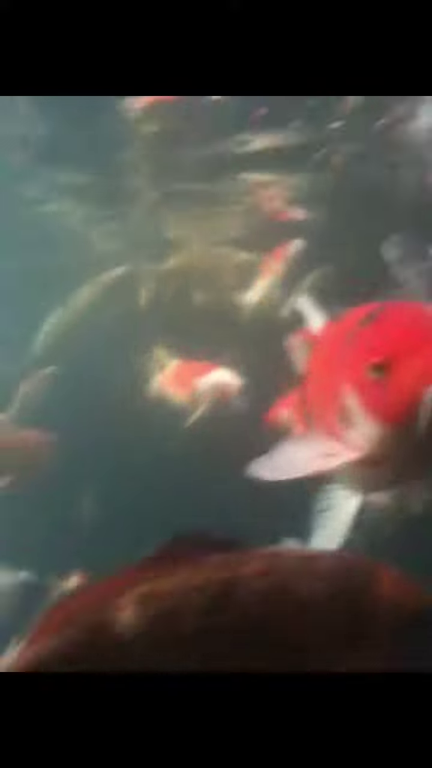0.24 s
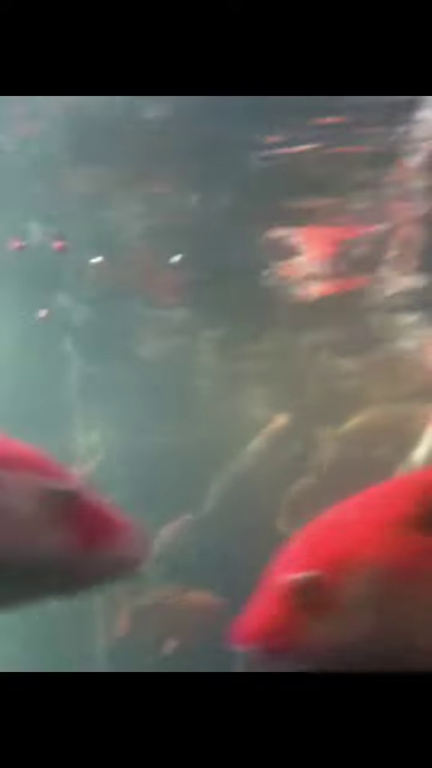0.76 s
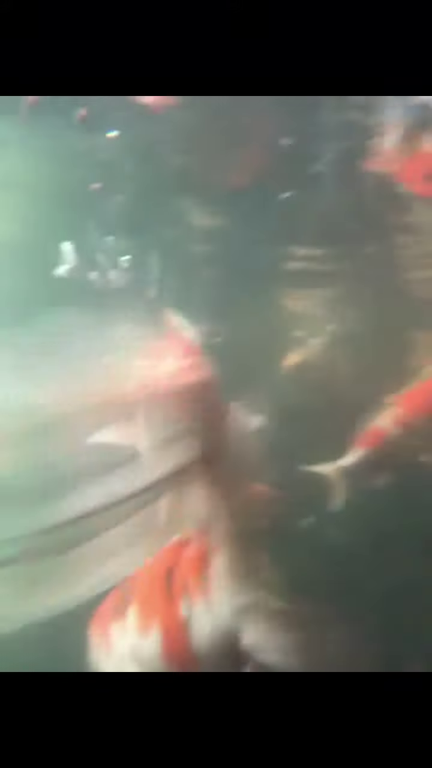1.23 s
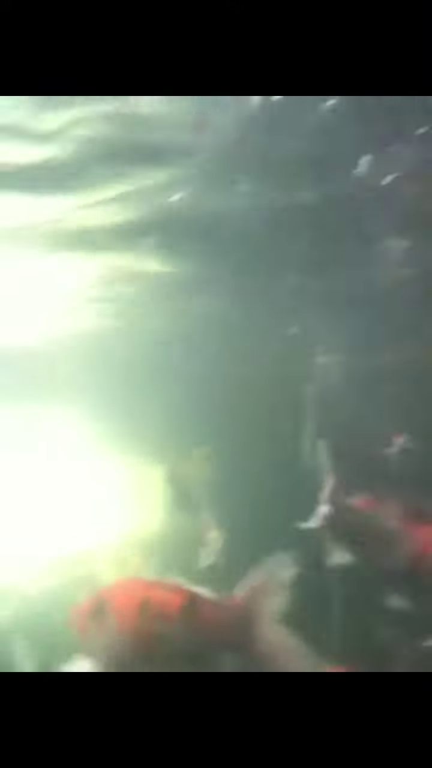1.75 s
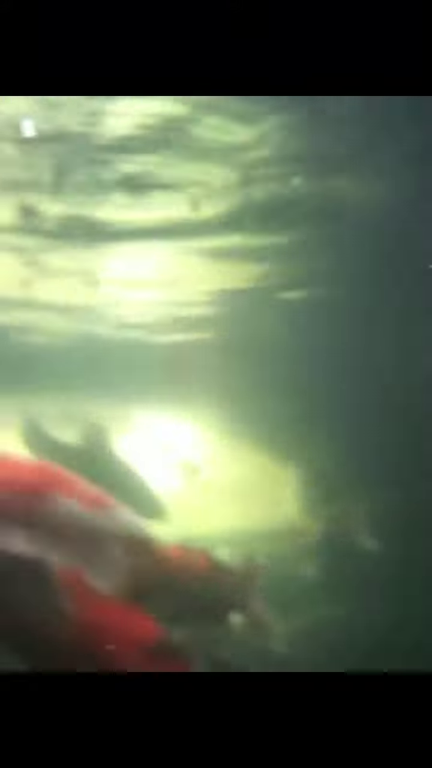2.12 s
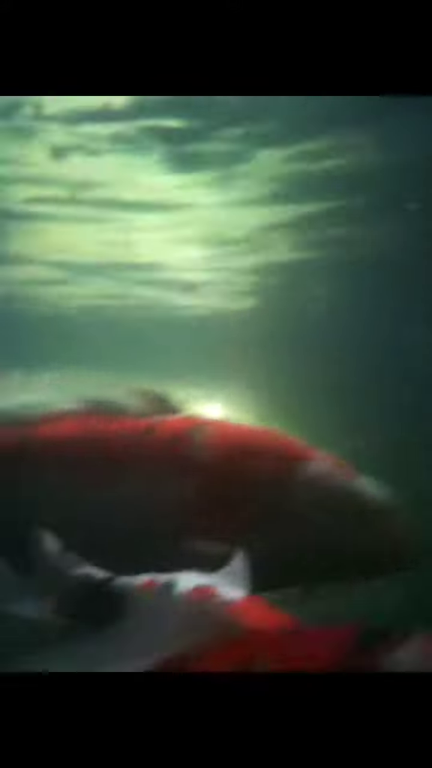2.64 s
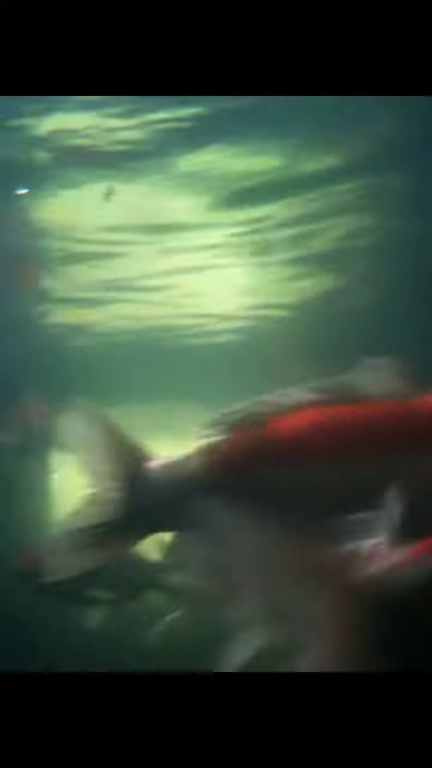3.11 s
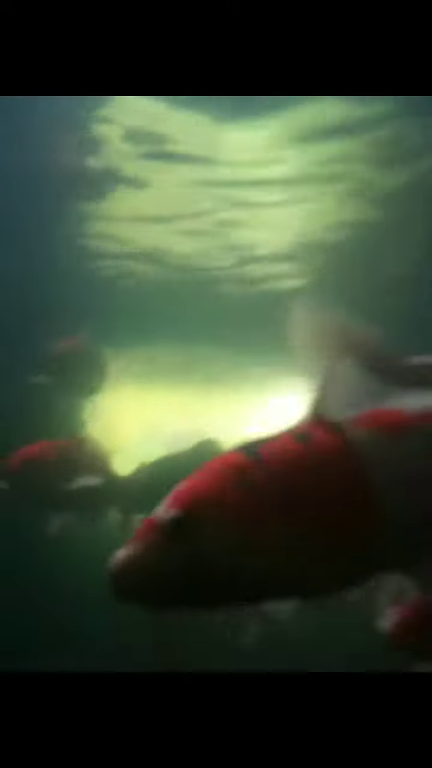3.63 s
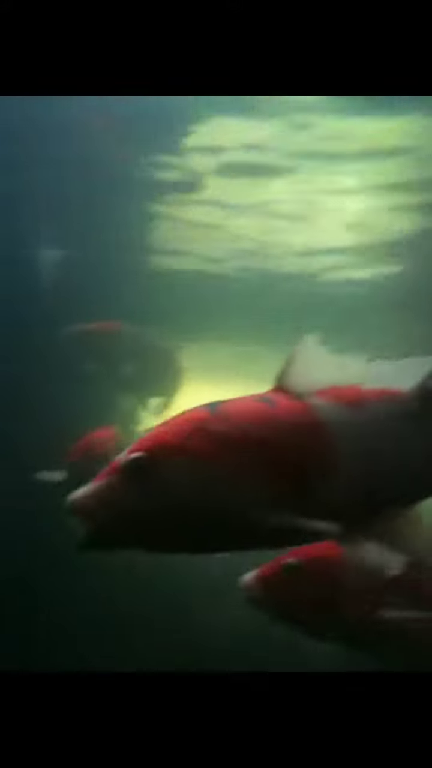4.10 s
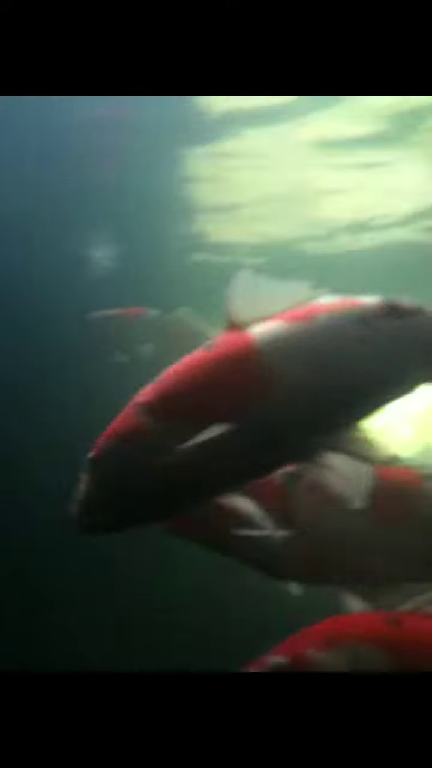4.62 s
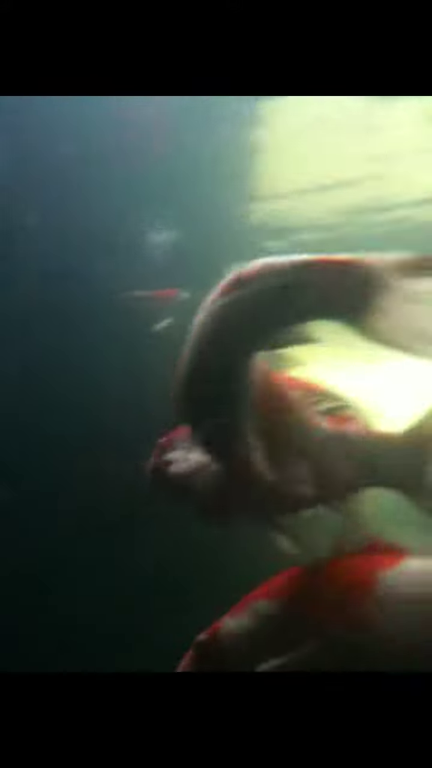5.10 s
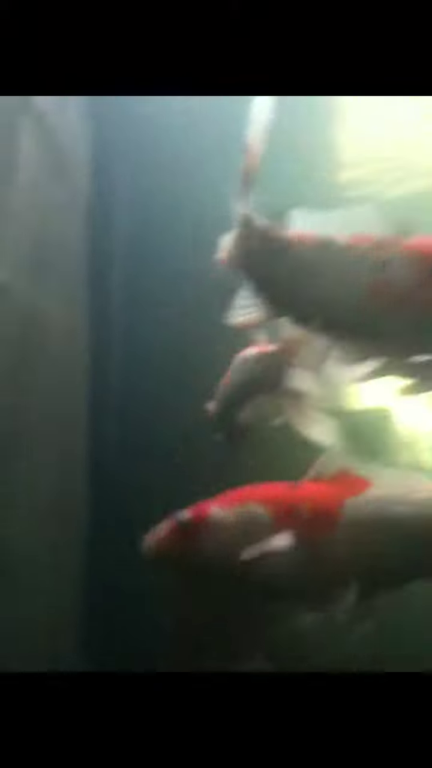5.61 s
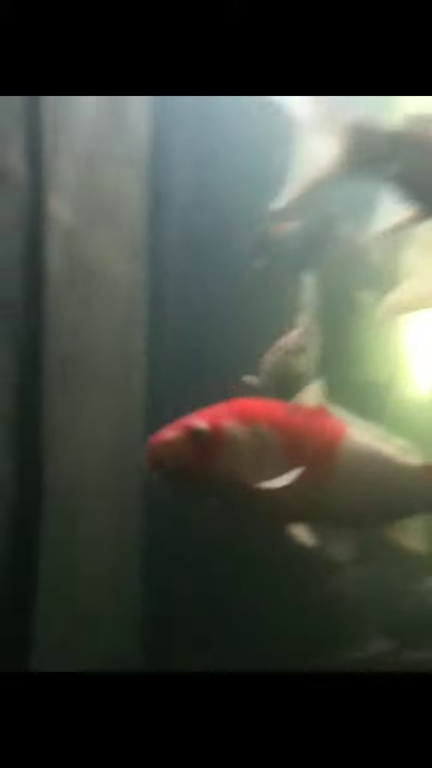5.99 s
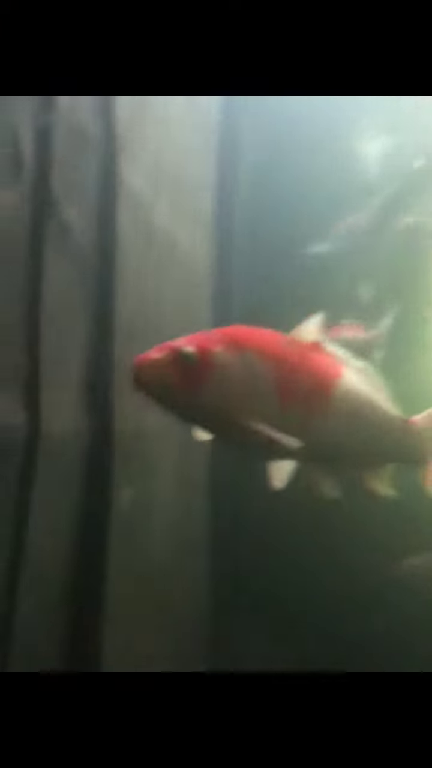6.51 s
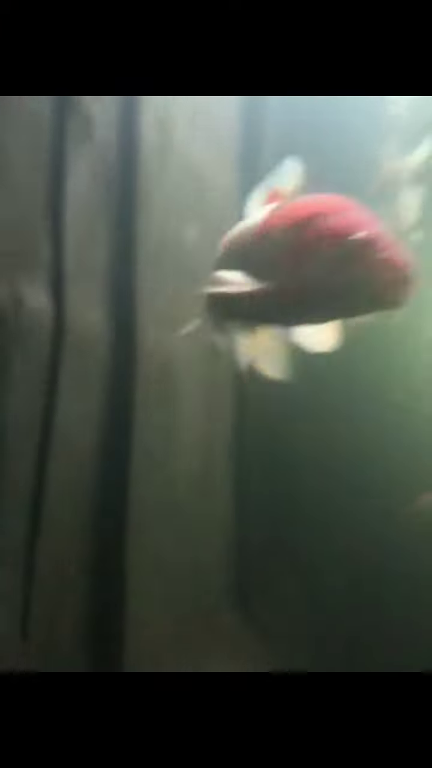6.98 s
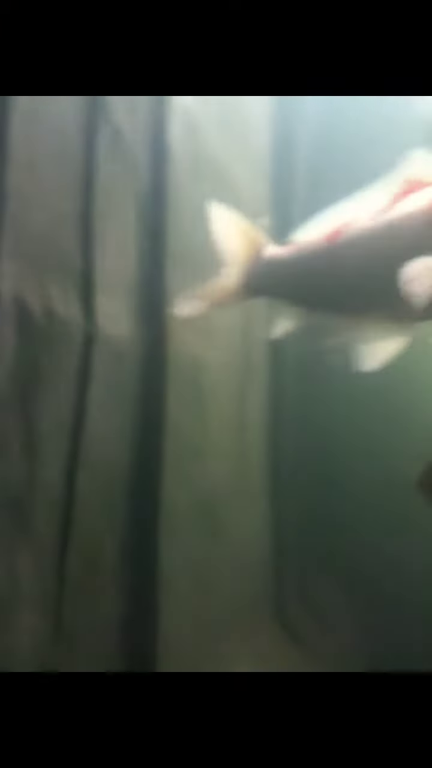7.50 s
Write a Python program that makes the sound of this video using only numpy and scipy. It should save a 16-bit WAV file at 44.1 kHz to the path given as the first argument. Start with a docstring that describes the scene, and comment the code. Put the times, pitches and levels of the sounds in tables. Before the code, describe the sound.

Microphone dips beneath pouring pond water: crisp splashes vanish, heavy muffled thuds and slaps pound close by, then recede into quiet burbling and clicks.

```python
"""Pond inflow heard from a sinking housing

Water pours from a pipe into a garden pond, heard by a camera in a waterproof housing that dips under.
The splashing in the air (droplet noise, ringing bubbles) is shut out; each slug of the stream thuds and
rings the housing's boom modes, the nearest ones with a slap (a crack and its inverted rebound).
The camera drifts away: the thuds sink to a dull rumble under gurgling bubbles (filtered random pulses,
decaying sines) and small ticks on the case (noise bursts through its modes).
"""
import sys
import numpy as np
from scipy import signal
from scipy.fft import irfft
from scipy.io import wavfile
from scipy.ndimage import uniform_filter1d, minimum_filter1d

SR = 44100
rng = np.random.default_rng(int(sys.argv[2]) if len(sys.argv) > 2 else 0)


def unload_audio(sound):
    """Save the sound as a 16-bit wav file, at the path given as the first command line argument."""
    columns = np.transpose(np.atleast_2d(sound))
    # keep every value between -1 and 1, then stretch to whole-number steps
    steps = np.round(np.clip(columns, -1, 1) * 32767)
    wavfile.write(sys.argv[1], SR, steps.astype(np.int16))


N = 341775
TIME = np.arange(N) / SR
HZ = np.fft.rfftfreq(8192, 1 / SR)
SLAP_REACH_DB = -5.5  # slaps no longer carry once the stream's nearness falls below this


def gain_of(db):
    """Decibels to amplitude."""
    return 10 ** (np.asarray(db) / 20)


def evened(x):
    """Scales to rms 1."""
    return x / np.sqrt(np.mean(x ** 2) + 1e-20)


def peaked(x):
    """Scales to peak 1."""
    return x / (abs(x).max() + 1e-20)


def curve(rows, t=TIME, axis=1):
    """One column of a table, joined by straight lines in time."""
    columns = np.transpose(rows)
    return np.interp(t, columns[0], columns[axis])


def colour(points):
    """Spectrum points as gains on the HZ grid; 12 dB/octave fall above the last point."""
    f, db = np.transpose(points)
    gain = gain_of(np.interp(np.log(HZ + 1), np.log(f + 1), db))
    return gain / np.maximum(HZ / f[-1], 1) ** 2


def causal(gain):
    """Minimum-phase impulse response of these gains, scaled to a maximum of 1 and floored at -100 dB."""
    log_gain = np.log(np.maximum(gain / gain.max(), 1e-5))
    circle = np.concatenate([log_gain, log_gain[-2:0:-1]])
    spectrum = np.exp(np.conj(signal.hilbert(circle)))[:len(HZ)]
    return irfft(spectrum)[:len(HZ)]


def through(x, response):
    """Convolution, cut to the length of the scene."""
    return signal.oaconvolve(x, response)[:N]


def add(mix, s, sound):
    """Mixes a sound in at time s."""
    part = mix[max(round(s * SR), 0):][:len(sound)]
    part += sound[:len(part)]


def patter(per_s, spread_db):
    """Random impulses of either sign, a few of them large."""
    size = gain_of(spread_db * np.minimum(rng.exponential(1, N), 4))
    return size * rng.choice([-1, 1], N) * (rng.random(N) < per_s / SR)


def flutter(per_s, depth_db):
    """A gain that wanders at random, per_s knots a second."""
    knots = rng.standard_normal(4096)
    return gain_of(depth_db * np.interp(TIME * per_s, np.arange(len(knots)), knots))


def bubble(hz, cycles, rise):
    """A bubble rings, fading to 1/e in some cycles; a rise above 0 lifts its pitch as it nears the surface."""
    age = np.arange(3000) / SR * hz / cycles  # in 1/e fades
    tone = np.sin(2 * np.pi * cycles * age * (1 + rise * np.minimum(age, 2)))
    return tone * np.exp(-age) * (1 - np.exp(-age * cycles)) ** 2


def bubbling(per_s, lowest_hz, highest_hz, cycles, rise, count=24):
    """Separate notes from bubbles of many sizes, each size with its own ring and glide."""
    pitches_hz = np.geomspace(lowest_hz, highest_hz, num=count)
    factors = rng.uniform(.6, 1.4, (count, 2))
    return evened(sum(through(patter(per_s / count, 3.6), bubble(hz, cycles * ring, rise * glide))
                      for hz, (ring, glide) in zip(pitches_hz, factors)))


def resonate(x, hz, width_hz):
    """A one-pole resonance that follows the curve hz, by shifting to 0 Hz and back."""
    turn, r = np.exp(2j * np.pi * np.cumsum(hz) / SR), np.exp(-np.pi * width_hz / SR)
    return (turn * signal.lfilter([1 - r], [1, -r], x / turn + 1e-18)).real


def case_gain():
    """Stiff modes of the case as gains on the HZ grid, cut below 770 Hz."""
    # Each row: pitch in Hz, width in Hz, relative level in dB.
    case_modes = [(1330, 300, 1), (1710, 60, 4.5), (2140, 240, -2.5), (2670, 150, 0), (3310, 260, -1.5),
                  (3940, 2500, -13), (5270, 98, 3), (6760, 280, -8.5), (8050, 640, -11), (9800, 330, -8.5),
                  (13000, 6600, -19)]
    power = sum(gain_of(db) ** 2 / (1 + (2 * (HZ - hz) / width_hz) ** 2)
                for hz, width_hz, db in case_modes)
    return np.sqrt(power) * HZ ** 4 / (HZ ** 4 + 770.0 ** 4)


def nearness_db(t=TIME):
    """Level of the stream against its level right beside the camera (-18.5 dB)."""
    # Stream level as the camera passes it and drifts off. Each row: time in seconds, level in dB.
    stream_level = [(0.0, -18), (0.41, -16.5), (1.47, -17), (2.85, -17.5), (3.06, -21.5), (3.39, -22),
                    (3.62, -27.5), (5.05, -32), (6.17, -41), (7.75, -44)]
    return curve(stream_level, t) + 18.5


def in_air(t=TIME, dip_s=0.24, dip_length_s=0.13):
    """1 while the housing is at the surface, sliding to 0 as it goes under."""
    return np.clip(1 - (t - dip_s) / dip_length_s, 0, 1)


def slugs(gap_s=0.04, jitter=0.307, thud_level_db=-23, slap_level_db=-42,
          thud_spread_db=3, slap_spread_db=10.5):
    """Heavy slugs plunging in, and lesser ones that break off the stream unevenly in between."""
    # Each row: time in seconds, relative slap level in dB, relative thud level in dB.
    heavy_slugs = [(.007, -27, -17.5), (.085, -19, -13.5), (0.154, -24, -17.5), (.19, -26.5, -17.5),
                   (0.265, -31, -15), (0.313, -11, -10.5), (.348, -17.5, -14), (.405, -26, -18.5),
                   (0.432, -18, -19), (.475, -30, -15.5), (0.511, -42, -13), (.553, -15.5, -24),
                   (.557, -8.5, -9.5), (0.5943, -14.5, -11.5), (.623, -24, -16.5), (0.652, -22, -21),
                   (0.6788, -15, -19.5), (.718, -44, -18.5), (0.761, -4.5, -12.5), (0.8225, -4, -6),
                   (.873, -19.5, -22.5), (.882, -16, -13.5), (0.979, -29.5, -15), (1.026, -23, -20),
                   (1.038, -10, -12.5), (1.0799, -9, -12.5), (1.112, -20, -14), (1.1785, -11.5, -13.5),
                   (1.249, -11.5, -9.5), (1.2863, -12, -16.5), (1.299, -27, -24), (1.32, -26, -22),
                   (1.3373, -0.5, -7.5), (1.405, -9.5, -5), (1.437, -19.5, -11.5), (1.4536, -12, -18),
                   (1.4564, -11.5, -19.5), (1.478, -24.5, -14), (1.5179, -14, -18.5), (1.5621, -9, -13),
                   (1.573, -23.5, -27), (1.6109, -16.5, -24.5), (1.635, -11, -23), (1.6459, -12.5, -23.5),
                   (1.6629, -15.5, -13), (1.679, -21.5, -20.5), (1.7136, -6.5, -13.5), (1.732, -20, -21.5),
                   (1.7539, -18.5, -12.5), (1.809, -6, -10), (1.8706, -12, -16.5), (1.895, -18, -14.5),
                   (1.928, -21, -16), (1.9581, -16.5, -15), (1.986, -20.5, -19.5), (2.0028, -11, -11),
                   (2.0618, -15.5, -27), (2.0672, -7.5, -14.5), (2.089, -21, -30.5), (2.1228, -21, -12),
                   (2.186, -15, -17.5), (2.205, -20, -24), (2.223, -13, -14), (2.2569, -12, -24),
                   (2.26, -9.5, -11), (2.2882, -21.5, -19.5), (2.3286, -22, -18.5), (2.3763, -8, -14.5),
                   (2.404, -15, -22), (2.4218, -25.5, -18), (2.4598, -20, -21), (2.466, -15.5, -11),
                   (2.5057, -7, -11), (2.5226, -22.5, -22), (2.563, -14, -17.5), (2.5759, -6.5, -9.5),
                   (2.593, -21.5, -15.5), (2.6297, -12, -16), (2.665, -46, -19), (2.6994, -14, -21),
                   (2.7083, -12.5, -17), (2.7237, -11.5, -7.5), (2.787, -19.5, -12.5), (2.8062, -10, -15.5),
                   (2.832, -21.5, -13.5), (2.89, -41, -15.5), (2.9159, -10.5, -18.5), (2.962, -19, -13),
                   (2.99, -43, -17), (3.0197, -25.5, -15), (3.0939, -11.5, -13.5), (3.114, -24.5, -19),
                   (3.172, -42, -18), (3.1933, -8, -15.5), (3.253, -43.5, -16), (3.32, -28.5, -14),
                   (3.3789, -17, -15.5), (3.4143, -20, -15), (3.466, -24, -16), (3.5, -46, -18.5),
                   (3.549, -40, -23), (3.603, -38.5, -20), (3.694, -42, -25.5), (3.768, -44, -28.5),
                   (3.792, -44, -26.5), (3.825, -46, -26), (3.863, -37, -17), (3.888, -37, -16.5),
                   (3.931, -44, -27), (4.019, -38, -23.5), (4.071, -40, -23.5), (4.152, -38, -20.5),
                   (4.196, -39, -19.5), (4.253, -46, -25.5), (4.319, -46, -30.5), (4.367, -48, -30),
                   (4.462, -41, -24), (4.479, -44, -29.5), (4.518, -46, -28.5), (4.564, -44, -24),
                   (4.632, -43, -26), (4.772, -47, -29), (4.855, -50, -25), (4.955, -39, -25),
                   (5.179, -41, -31.5), (5.212, -50, -33), (5.242, -45, -32), (5.346, -50, -33),
                   (5.488, -46, -31.5), (5.546, -50, -31.5), (5.681, -44, -31.5), (6.032, -47, -37),
                   (6.333, -48, -34), (6.713, -54, -40.5), (6.829, -58, -41.5), (6.883, -54, -40),
                   (6.958, -54, -40.5), (7.064, -58, -43), (7.331, -54, -39), (7.367, -54, -40.5),
                   (7.506, -54, -41)]
    rows = list(heavy_slugs)
    edges = [0, *sorted(row[0] for row in heavy_slugs), N / SR]
    chances = rng.standard_normal((len(edges), 64, 3))
    for start, end, chance in zip(edges, edges[1:], chances):
        steps = max(round((end - start) / gap_s), 1)
        for k, (early, thud, slap) in zip(range(1, steps), np.clip(chance, -2, 2)):
            s = start + (end - start) * (k + jitter * early) / steps
            near_db = nearness_db(s)
            slap_db = slap_level_db + 2 * near_db + slap_spread_db * slap
            thud_db = thud_level_db + near_db + thud_spread_db * thud
            rows.append((s, slap_db, thud_db))
    return rows


def surge(stream, settle_s, lull):
    """A gain of rms 1 that jumps with each slug and settles to a lull before the next."""
    kicks, t = np.zeros(N), np.arange(SR // 4) / SR
    for s, _, db in stream:
        add(kicks, s, gain_of((db - nearness_db(s)) / 2) * t / settle_s * np.exp(-t / settle_s))
    return evened(evened(kicks) + lull)


def trickle(level_db=-66.5, follows=0.42):
    """A faint crackle of small bubbles rising around the camera, coloured by the case."""
    blips = bubbling(260, 1150, 3400, 3, 0)
    crackle = evened(through(blips * flutter(15, 4), causal(case_gain())))
    return crackle * gain_of(level_db + follows * nearness_db())


def fizz(grain_db=-70.0, hiss_db=-71.5, ring_db=-73.0, ring_hz=5330, follows=0.04):
    """Tiny bubbles burst on the case in flurries and ring near its sharpest high mode, over a patchy hiss."""
    # Hiss spectrum. Each row: frequency in Hz, relative level in dB.
    fizz_colour = [(710, -42), (1200, 0.5), (1700, -3.5), (1890, -11.5), (2710, -2.5), (2950, -5.5),
                   (3910, -2), (5300, -6), (6100, -9), (9610, -4), (10800, -13.5), (15200, -21),
                   (16000, -37)]
    swell = flutter(11, 2.)
    bursts = patter(900, 3.) * flutter(22, 3.)
    grains = evened(through(bursts * swell, causal(case_gain())))
    flurries = swell * flutter(24, 4.)
    ring = evened(sum(through(patter(120, 3.) * flurries, bubble(ring_hz * k, 16, 0))
                      for k in np.linspace(.97, 1.03, num=4)))
    shape, hiss = colour(fizz_colour), np.zeros(N)
    for hz in np.geomspace(1000, 15000, num=16):  # bands flutter independently
        band = shape * np.exp(-(np.log((HZ + 1) / hz) / .13) ** 2)
        noise = rng.standard_normal(N) * np.sqrt(swell) * flutter(28, 2.5)
        hiss += band.max() * through(noise, causal(band))
    out = gain_of(grain_db) * grains + gain_of(ring_db) * ring + gain_of(hiss_db) * evened(hiss)
    return gain_of(follows * nearness_db()) * out


def ticks(focus_db=7.0, focus_width=0.37, note_db=-13.0, rise=0.024, onset_s=0.0005, soft_s=0.018):
    """A bubble scrapes the case: a gritty tick and a short rising note; long scrapes swell in softly."""
    # Each row: start in seconds, scrape peak in dB, pitch in Hz, fade to 1/e in seconds.
    tick_rows = [(3.242, -52, 3370, 0.01), (3.2788, -43.5, 3240, 0.029), (3.8, -51, 3300, 0.0078),
                 (3.911, -42, 3460, 0.019), (3.943, -50, 4000, .016), (4.107, -52, 5300, 0.014),
                 (4.295, -45.5, 1900, 0.0092), (4.359, -49.5, 3220, 0.015), (4.388, -50, 3100, 0.014),
                 (4.44, -44, 5360, .012), (4.442, -55, 2680, 0.01), (4.5525, -45, 3180, 0.0064),
                 (4.6838, -45, 1980, 0.0076), (4.688, -41.5, 3200, 0.019), (4.848, -47.5, 3270, 0.018),
                 (5.151, -46.5, 5200, 0.03), (5.178, -48, 3240, 0.031), (5.5482, -49, 2560, 0.013),
                 (5.602, -41, 5600, 0.018), (5.7644, -42.5, 1750, .01), (5.8148, -49, 1800, .012),
                 (5.827, -44, 1820, 0.017), (6.178, -51.5, 3350, 0.035), (6.256, -45.5, 4000, 0.024),
                 (6.353, -47, 5360, 0.0078), (6.394, -50, 5200, 0.0094), (6.472, -51, 5400, 0.02),
                 (6.742, -42.5, 1692, 0.014), (6.795, -49.5, 3400, 0.011), (6.958, -55, 2920, 0.0061),
                 (7.041, -41, 1620, 0.016), (7.156, -43, 1720, 0.02), (7.304, -46.5, 1650, 0.011),
                 (7.5415, -49.5, 2770, 0.012), (7.716, -48.5, 5100, 0.025)]
    out, t = np.zeros(N), np.arange(SR // 10) / SR
    case = case_gain()
    for (s, db, hz, fade_s), grit in zip(tick_rows, rng.standard_normal((len(tick_rows), len(t)))):
        focus = gain_of(focus_db * np.exp(-(np.log((HZ + 1) / hz) / focus_width) ** 2))
        swell_s = onset_s * (1 + (fade_s / soft_s) ** 4)
        friction = grit * np.exp(-t / fade_s) * (1 - np.exp(-t / swell_s))
        scrape = signal.fftconvolve(friction, causal(case * focus))
        add(out, s, gain_of(db) * peaked(scrape))
        add(out, s, gain_of(db + note_db) * bubble(hz, hz * fade_s / 2, rise))
    return out


def spray(level_db=4.0, shut_s=0.21, drips_db=-2.5, drop_fade_s=0.003):
    """Splashing in open air: a dense crackle of droplets, tiny ringing bubbles and a few larger drops."""
    # Shut out by the dip, briefly back as the housing bobs up.
    # Each row: time in seconds, level in dB before level_db is added.
    spray_level = [(0, -48.5), (.2, -50), (.48, -62.5), (.6, -106), (.9, -70.5), (1.0, -55.5), (1.2, -64)]
    # Spectrum. Each row: frequency in Hz, relative level in dB.
    spray_colour = [(200, -13), (600, 0.5), (1300, 14), (1900, -2.5), (2300, 4), (3000, -3), (3700, -5.5),
                    (4600, -8), (5700, -1.5), (6500, -9), (7500, -17), (10000, -18), (12000, -26),
                    (16000, -33.5)]
    # Larger drops smacking the surface. Each row: start in seconds, peak in dB.
    drops = [(.009, -42), (.034, -43), (.076, -39), (0.125, -38.5), (.16, -42), (.2, -45), (0.225, -37),
             (0.266, -35.5), (.405, -41)]
    shape, t = colour(spray_colour), np.arange(SR // 30) / SR
    droplets = patter(9000, 3.3) * flutter(110, 3.0)
    crackle = evened(through(droplets, causal(shape)))
    drips = np.zeros(N)
    for hz in np.geomspace(1900, 10500, num=36):
        weight = np.interp(hz, HZ, shape) * hz ** .25
        drips += weight * through(patter(42, 4.0), bubble(hz, 12, .004))
    shut = np.clip((spray_level[-1][0] - TIME) / shut_s, 0, 1)
    out = shut * gain_of(curve(spray_level) + level_db) * (crackle + gain_of(drips_db) * evened(drips))
    for (s, db), grit in zip(drops, rng.standard_normal((len(drops), len(t)))):
        smack = signal.fftconvolve(grit * np.exp(-t / drop_fade_s), causal(shape * HZ))
        add(out, s, gain_of(db) * peaked(smack))
    return out


def bubble_run(width_hz=220):
    """Bubbles shrink as they stream past the case, so their ringing climbs."""
    # Each row: time in seconds, level in dB, pitch in Hz.
    run = [(.95, -86, 1004), (1.1, -46, 1130), (1.2, -55.5, 1300), (1.29, -48.5, 1640), (1.38, -52, 1830),
           (1.52, -56, 1810), (1.65, -80, 1830)]
    hz = curve(run, axis=2)
    passing = (TIME > run[0][0]) & (TIME < run[-1][0])
    ringing = resonate(resonate(patter(270, 7.4), hz, width_hz), hz, width_hz)
    return passing * gain_of(curve(run)) * evened(ringing)


def gurgle(level_db=-42.5, follows=1.0, shallow_db=-16.0, sink_s=2.6, notes_db=-8.5,
           froth_db=-3.0, ringing_db=-9.5):
    """Bubble pulses and notes ring near 1 kHz, fuller as the camera sinks; froth and single plops on top."""
    # Spectra of gurgle and froth. Each row: frequency in Hz, relative level in dB.
    gurgle_colour = [(300, -43), (620, -15), (800, -3.5), (920, 3), (1010, 8.5), (1100, -3.5), (1250, -18),
                     (1500, -28.5), (3000, -58)]
    froth_colour = [(300, -17.5), (600, 4.5), (790, 1), (1040, 6), (1250, -3), (1550, -15), (1780, -5.5),
                    (1980, -18), (3000, -25.5), (6000, -66.5)]
    # Froth of smaller bubbles, loudest close to the stream. Each row: time in seconds,
    # level in dB before froth_db or ringing_db is added.
    froth_level = [(0, -44), (.7, -49), (1.3, -40.5), (2.7, -41), (3.2, -72.5), (4.6, -69.5), (7.75, -82)]
    # Bubbles that stand out. Each row: start in seconds, peak in dB, pitch in Hz, cycles to 1/e.
    plops = [(0.009, -30.5, 5750, 6.9), (.034, -40, 6570, 9.7), (.05, -41, 2310, 9.4),
             (.075, -45, 6700, 11), (0.083, -30.5, 2420, 5.4), (.094, -39, 3000, 9), (.124, -33, 5370, 11),
             (.136, -43, 2310, 8), (0.158, -37, 2380, 6), (0.179, -36.5, 2480, 15), (0.209, -35, 2240, 8.2),
             (.218, -36, 2930, 8.9), (0.269, -42, 5830, 11), (.289, -38, 5500, 14),
             (0.373, -36.5, 2170, 9.2), (.505, -55, 3300, 30), (.883, -42.5, 8300, 13),
             (.977, -40, 2300, 7), (.984, -43, 2880, 9), (1.121, -29.5, 1090, 7.2),
             (1.223, -31.5, 1135, 7.4), (1.232, -42, 1550, 9.7), (1.275, -34, 1700, 6),
             (1.304, -35, 1720, 6.6), (1.375, -46, 1800, 7.9), (1.508, -44, 1820, 10),
             (1.84, -32, 1047, 9.8), (1.938, -29, 1066, 13), (2.115, -26.5, 1036, 4.1),
             (2.172, -34.5, 1190, 6.2), (2.311, -29, 1076, 16), (2.496, -42, 1510, 6),
             (2.55, -20.5, 1070, 4), (2.646, -32, 1050, 8), (2.716, -23.5, 1105, 6.1),
             (2.771, -28.5, 1240, 4), (2.774, -37.5, 1770, 6.1), (2.853, -32, 1073, 10),
             (2.879, -34.5, 1083, 18), (3.028, -28, 976, 12), (3.175, -35, 1064, 7), (3.258, -33, 880, 6),
             (3.35, -33, 1020, 8.6), (3.745, -39, 960, 9), (3.971, -39, 1024, 12), (4.13, -47, 1240, 5),
             (4.196, -47, 1110, 8.8), (4.444, -46.5, 2660, 17), (4.559, -32.5, 978, 12),
             (4.605, -56, 1380, 7), (4.686, -40.5, 1680, 11), (4.69, -44, 2040, 12), (4.93, -40, 963, 3.4),
             (5.082, -42, 960, 15), (5.408, -38, 984, 3.1), (5.787, -48, 904, 7.2), (6.009, -34, 1006, 2.3),
             (6.345, -53, 950, 4.5), (6.47, -53, 1000, 5), (6.62, -57, 970, 5.8), (6.84, -51.5, 1020, 5.8),
             (6.991, -54, 1380, 7), (6.996, -42.5, 1700, 14), (7.008, -53, 1490, 7.8),
             (7.043, -40, 1410, 6), (7.158, -63, 1380, 6), (7.255, -53, 810, 4), (7.318, -51, 910, 4)]
    pulses = patter(500, 3.3) * flutter(25, 2.6)
    bubbles = evened(through(pulses, causal(colour(gurgle_colour))))
    bursts = patter(500, 3.0) * flutter(40, 3.0)
    froth = evened(through(bursts, causal(colour(froth_colour))))
    ringing = bubbling(220, 950, 1650, 6, .008)
    notes = bubbling(160, 780, 1170, 5, .012)
    depth_db = shallow_db * np.maximum(1 - TIME / sink_s, 0)
    out = (bubbles + gain_of(notes_db) * notes) * gain_of(level_db + follows * nearness_db() + depth_db)
    out += (gain_of(froth_db) * froth + gain_of(ringing_db) * ringing) * gain_of(curve(froth_level))
    for s, db, hz, cycles in plops:
        add(out, s, gain_of(db) * peaked(bubble(hz, cycles, 0.0012)))
    return out


def churn(stream, churn_db=-25, churn_follows=1.03, lumpy_db=1.0, rumble_db=-26.5, rumble_follows=1.39,
          rumble_air_db=-23.0, murmur_db=-50.0):
    """Blobs surge after each slug and keep the boom going, over the bubble cloud's heave and pond murmur."""
    # Spectra of blobs, heave and murmur. Each row: frequency in Hz, relative level in dB.
    churn_colour = [(30, -56), (90, -24), (150, -3.5), (210, -4), (262, 1.5), (290, -3), (330, -20.5),
                    (375, -13), (440, -14), (520, -43), (620, -49), (1200, -83.5)]
    rumble_colour = [(20, -60), (45, -40), (65, -20), (85, -5), (105, 0), (150, -1), (195, -8), (300, -28),
                     (600, -60)]
    murmur_colour = [(20, -9.5), (45, 4.5), (70, 4), (110, 17.5), (250, -17), (350, 4), (450, -8),
                     (620, -31), (1400, -34.5), (2500, -46)]
    blobs = evened(through(patter(260, 5.27) * flutter(30, lumpy_db), causal(colour(churn_colour))))
    heave = evened(through(patter(300, 1.5), causal(colour(rumble_colour))))
    murmur = evened(through(patter(170, 3.4) * flutter(22, 2.5), causal(colour(murmur_colour))))
    blobs *= gain_of(churn_db + churn_follows * nearness_db())
    heave *= gain_of(rumble_db + rumble_follows * nearness_db() + rumble_air_db * in_air())
    return surge(stream, .014, .3) * (blobs + heave) + gain_of(murmur_db) * murmur


def slaps(stream, level_db=1.0, air_db=-5.0, collapse_s=.001, rebound_s=.0056, rebound_db=-7.5,
          ragged_db=-9.5, ragged_s=0.02, grit_db=-34, grit_s=0.0093, clean_db=-11.5, cleaning=0.21):
    """A near slug's cavity collapses with a crack, then a weaker inverted rebound; soft slaps are ragged."""
    # Spectrum. Each row: frequency in Hz, relative level in dB.
    slap_colour = [(30, -77), (60, -39), (120, -8), (250, 5.5), (460, 4.5), (700, -4), (1000, -10.5),
                   (2000, -25), (3500, -34), (6000, -43.5), (10000, -51.5), (16000, -61.5)]
    jumps, t = np.zeros(N), np.arange(SR // 30) / SR
    chances, grits = rng.random((512, 5, 3)), rng.standard_normal((512, len(t)))
    for (s, slap_db, _), chance, grit in zip(stream, chances, grits):
        if nearness_db(s) < SLAP_REACH_DB:
            continue
        db, crack_s = slap_db + air_db * in_air(s) ** 2, s + collapse_s
        add(jumps, crack_s, gain_of([db]))
        add(jumps, crack_s + rebound_s * (1 + .05 * grit[0]), -gain_of([db + rebound_db + grit[1]]))
        add(jumps, s, gain_of(db + grit_db) * grit * np.exp(-t / grit_s))
        for when, size, side in chance:  # small cracks around the main one
            lag = when - .25
            cluster_db = ragged_db + 10 * (size - .5) - 7 * abs(lag)
            cluster_db -= cleaning * max(db - clean_db, -10)  # hard slaps are cleaner
            add(jumps, crack_s + ragged_s * lag, gain_of([db + cluster_db]) * np.sign(side - .5))
    return gain_of(level_db) * through(jumps, peaked(causal(colour(slap_colour))))


def thuds(stream, push_s=0.0025, far_push_s=0.003, detune=0.04, level_db=6.0, thinning_hz_per_db=0.77,
          wet_lowest_hz=115, air_lowest_hz=158, boom_lag_s=.004):
    """Each slug's push, longer and thinner from afar, rings the housing; slugs differ in colour."""
    # What a thud rings. Each row: pitch as a factor on the boom, relative level in dB, t60 in seconds;
    # pitch and level vary by slug.
    boom_modes = [(0.428, -19, 0.051), (0.739, -8, 0.029), (0.999, 0.5, 0.15), (1.071, -1.5, 0.011),
                  (1.66, -18, 0.05)]
    # The boom wanders as the water's load on the housing changes. Each row: time in seconds, pitch in Hz.
    boom_pitch = [(.2, 288), (.55, 250.6), (.66, 300), (.85, 273), (1.2, 271), (1.41, 245), (1.55, 275.7),
                  (1.75, 286), (2.0, 272.5), (2.25, 275), (2.42, 300), (2.72, 255), (2.82, 277.6),
                  (3.3, 250), (3.5, 277.7), (4.25, 256.7), (4.5, 284), (4.9, 254.3), (7.75, 274)]
    out, t = np.zeros(N), np.arange(SR // 5) / SR
    factor, mode_db, t60_s = np.transpose(boom_modes)[:, :, None]
    chances = rng.standard_normal((512, 2, len(boom_modes), 1))
    for (s, slap_db, db), chance in zip(stream, chances):
        near_db = nearness_db(s)
        length_s = np.interp(near_db, [2 * SLAP_REACH_DB, 0], [far_push_s, push_s])
        push = np.sin(np.pi * np.minimum(t / length_s, 1))[:SR // 100] ** 2
        # the low modes belong to the trapped air and vary most
        hz = curve(boom_pitch, s) * factor * (1 + detune * chance[0] / factor.clip(.5, 1) ** 2)
        ring_gain = gain_of(mode_db + 2 * chance[1] - 60 * t / t60_s)
        ring = (ring_gain * np.sin(2 * np.pi * hz * t)).sum(0)
        # going under lets deeper sound in; distance thins it
        lowest_hz = np.interp(in_air(s), [0, 1], [wet_lowest_hz, air_lowest_hz])
        lowest_hz -= thinning_hz_per_db * min(near_db, 0)
        high_pass = signal.butter(4, lowest_hz, "high", fs=SR)
        thud = peaked(signal.lfilter(*high_pass, signal.fftconvolve(ring, push)))
        cracked = np.clip(1 + (slap_db - db) / 10, 0, 1)  # after a hard crack the boom builds later
        add(out, s - .001 + boom_lag_s * cracked, gain_of(db + level_db) * thud)
    return out


def scene():
    """Everything reaches one microphone inside the housing."""
    stream = slugs()
    background = trickle() + fizz() + ticks() + spray()
    water = bubble_run() + gurgle() + churn(stream)
    return (background + water + slaps(stream) + thuds(stream))[None]


def record(dry):
    """A fast limiter holds down the loudest peaks; then the microphone's bass cut and the band limit."""
    allowed = np.minimum(.71 / (abs(dry) + 1e-9), 1)
    limited = dry * uniform_filter1d(minimum_filter1d(allowed, size=201), size=201)
    thinned = signal.lfilter(*signal.butter(2, 34, "high", fs=SR), limited)
    band_limit = signal.firwin(511, 15950, window=("kaiser", 9), fs=SR)  # low-pass at 15950 Hz
    return signal.oaconvolve(thinned, band_limit[None], "same")


dry = scene()
out = record(dry)
unload_audio(out)
```